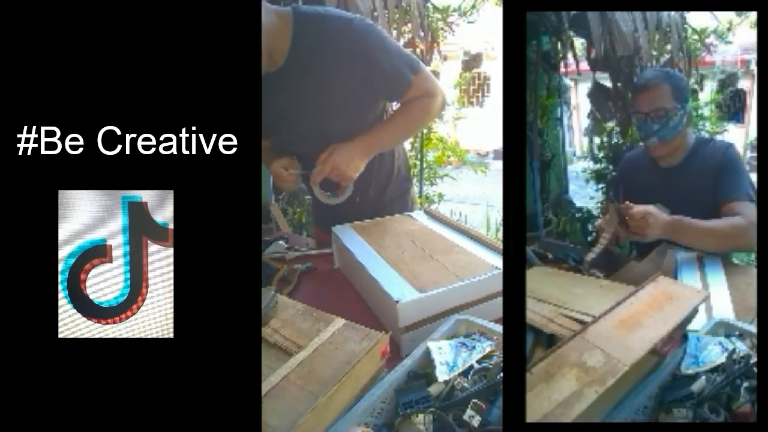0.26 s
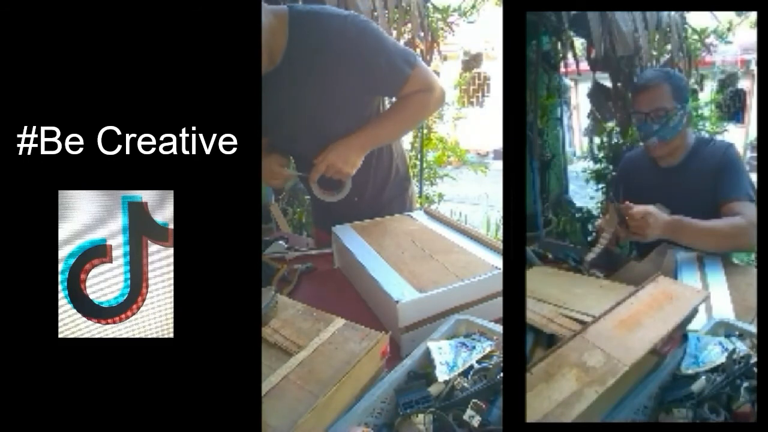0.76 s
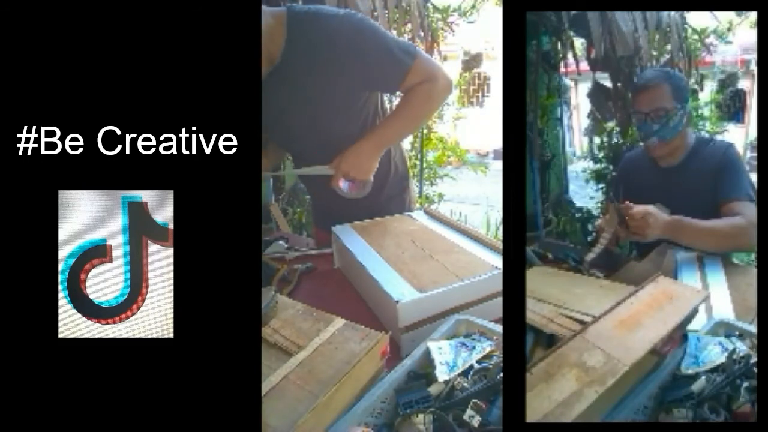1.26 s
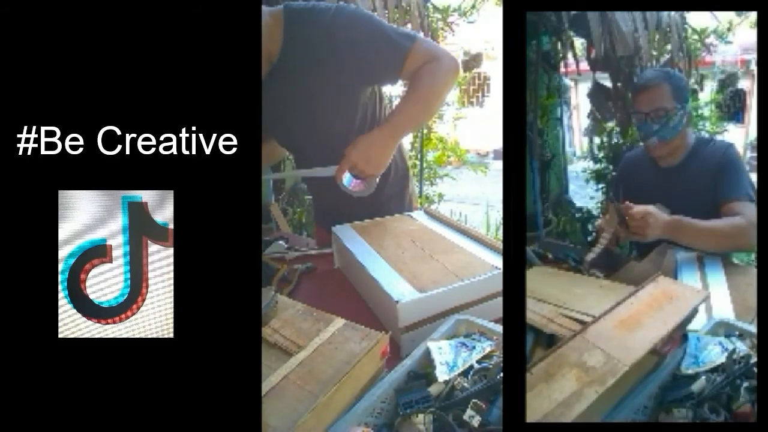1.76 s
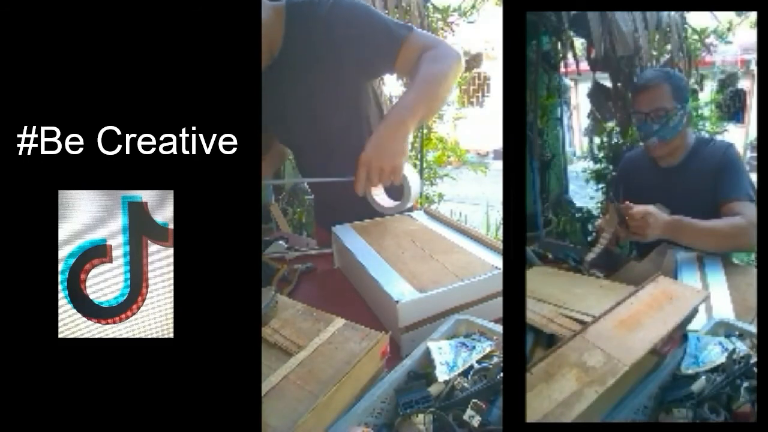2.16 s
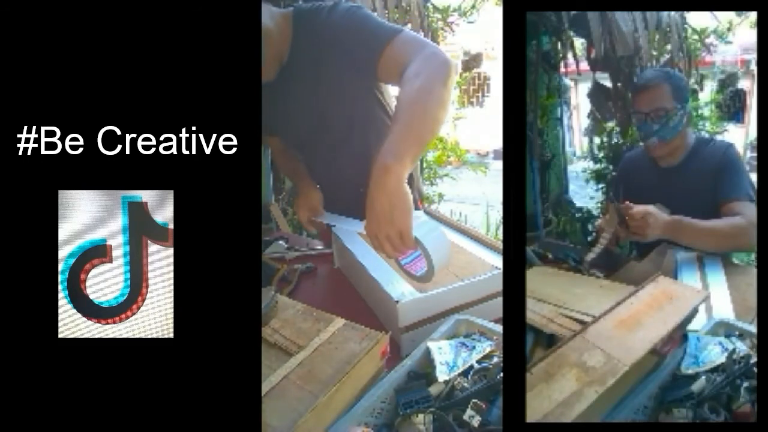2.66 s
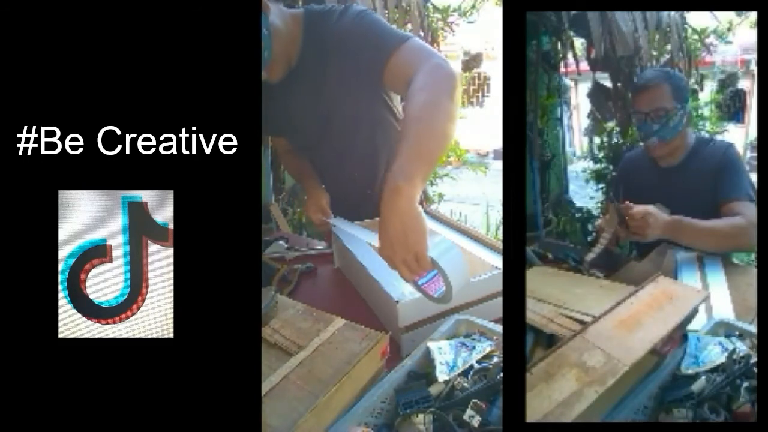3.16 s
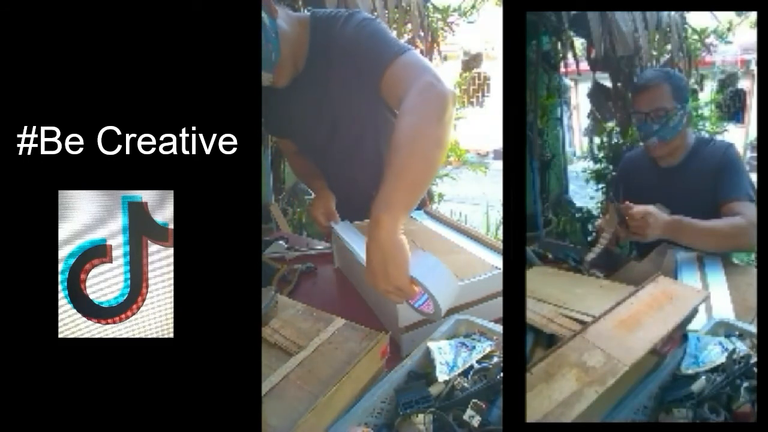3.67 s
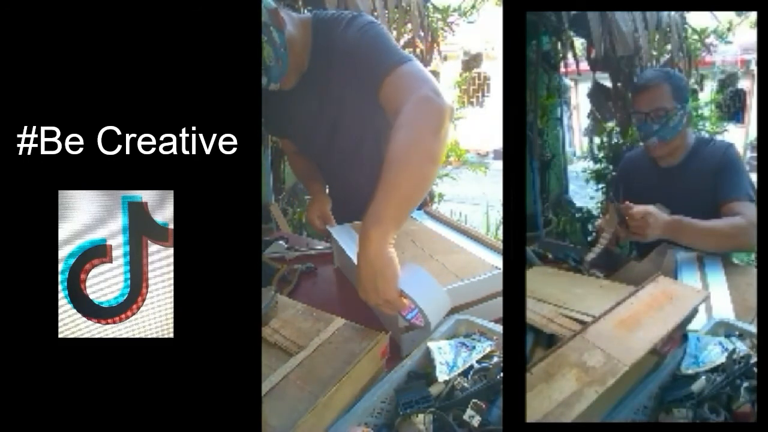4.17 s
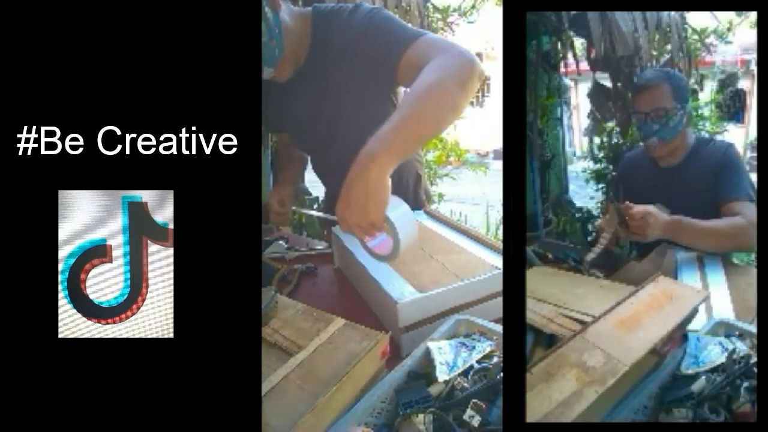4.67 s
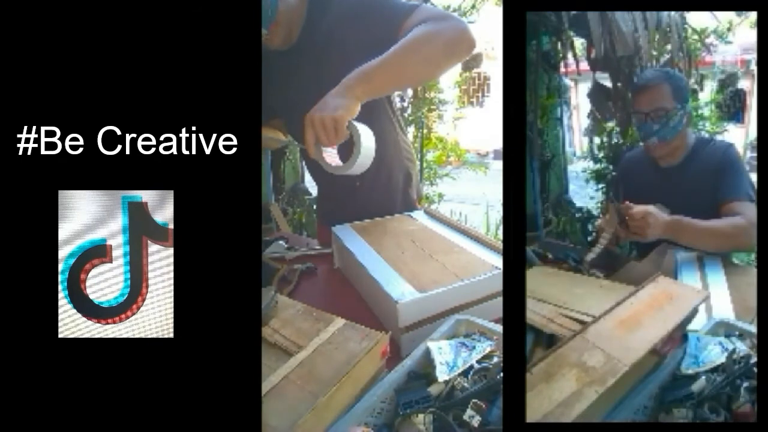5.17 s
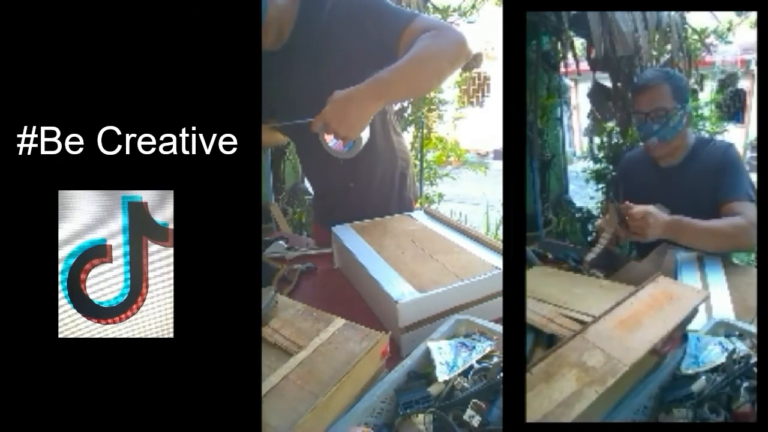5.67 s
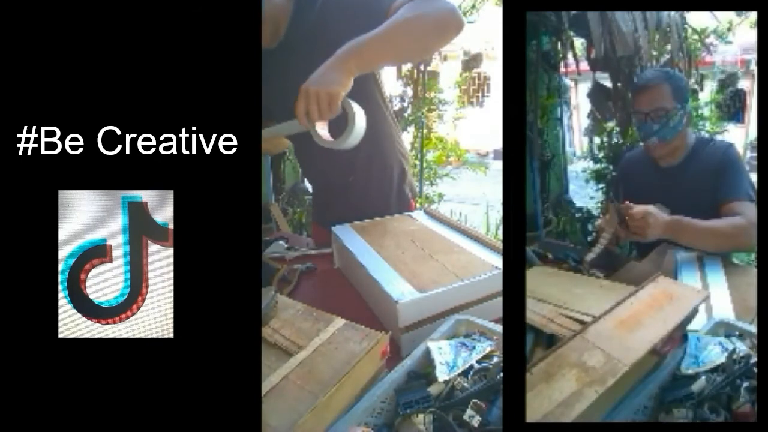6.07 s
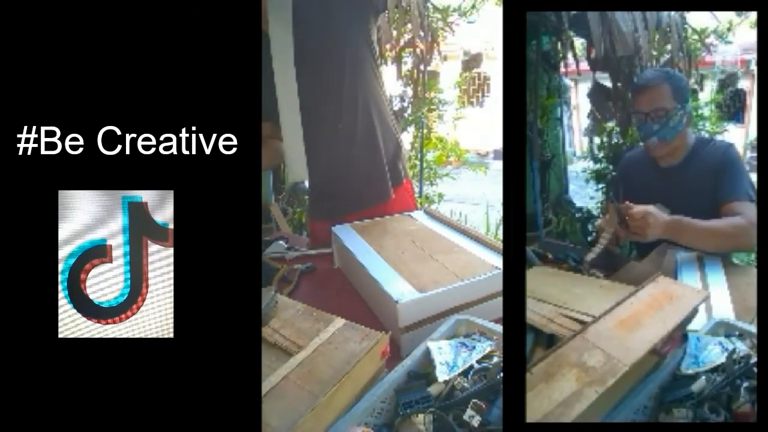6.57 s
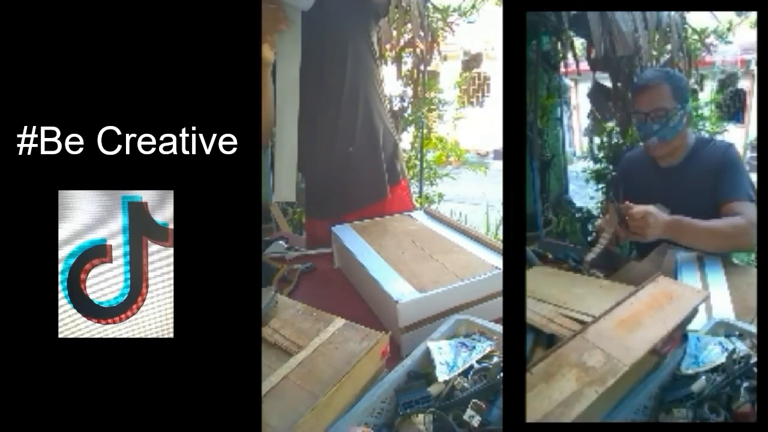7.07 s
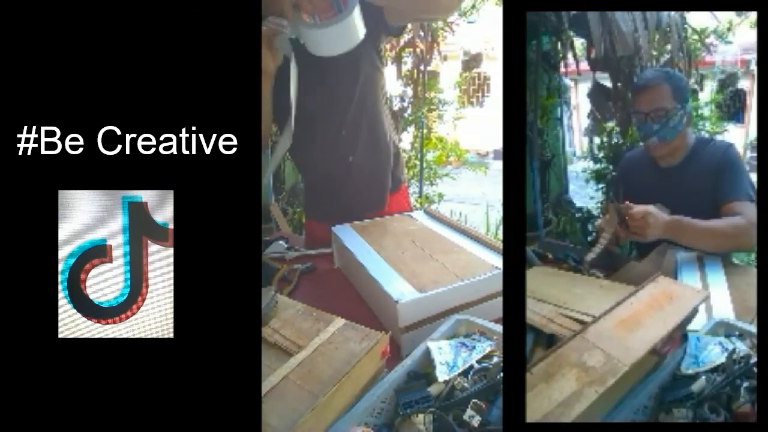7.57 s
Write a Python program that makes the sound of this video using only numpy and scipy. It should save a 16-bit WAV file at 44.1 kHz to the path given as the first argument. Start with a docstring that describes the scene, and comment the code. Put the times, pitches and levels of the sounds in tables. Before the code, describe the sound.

Sticky tape is pulled in four quick, rasping jerks, each about a tenth of a second, very close and dry with a light outdoor echo. A weaker tug and gentle hand smoothing follow, under faint wavering rooster crows, hen clucks and thin bird peeps. After a sharp snap and a quieter background, one fast rip and a soft crackling draw finish it.

```python
"""Sticky tape is jerked off a roll in a leafy yard: four loud rips, a slow tug, a nick and a snap of the strip,
then one more rip and a slow crackling peel. The glue lets go in dense random snaps, coloured by strip and core.
A hand smooths the tape down on a box in strokes of filtered noise. Roosters crow near and far and a hen clucks,
as unsteady harmonic tones shaped by a throat; small birds peep in gliding sines. Air and echoes surround it all."""
import sys
import numpy as np
from scipy import signal
from scipy.fft import rfft, irfft
from scipy.io import wavfile

SR = 44100
rng = np.random.default_rng(int(sys.argv[2]) if len(sys.argv) > 2 else 0)


def unload_wav(signal):
    """Save mono or channel-first audio to the path in sys.argv[1] as 16-bit WAV at rate SR, clipped to [-1, 1]."""
    wavfile.write(
        sys.argv[1],
        SR,
        np.round(np.clip(np.atleast_2d(signal).T, -1, 1) * 32767).astype(np.int16),
    )


N = 344862
TIME = np.arange(N) / SR

# Event levels are set ahead of each source's trims and the mix; spectrum levels are relative.

# outdoor air spectrum: pitch_hz, level_db
AIR_SPECTRUM = [(15, -12), (25, 1), (48, -1), (68, 4), (95, -3), (164, -10), (445, -13), (826, -10),
                (1300, -17), (1660, -15), (2560, -27), (4750, -25), (6210, -34), (7700, -48), (15500, -47)]
AIR_LEVEL_DB = -52.5
# one near rooster note: start_s, length_s, pitch_hz, level_db, sag (share of pitch lost by the end),
# second_harmonic_db, hoarseness (share of pitch)
NEAR_CROW = (0, .17, 925, -29.5, .2, 0, .004)
# distant rooster notes: start_s, length_s, pitch_hz, level_db, sag (share of pitch), second_harmonic_db,
# hoarseness (share of pitch)
FAR_CROWS = [(2.17, .18, 1030, -45, .02, -9, .045), (3.09, .23, 795, -44, .02, 2, .028),
             (3.35, .23, 920, -40.5, .03, -6, .032), (3.50, 1.42, 570, -59, .03, 0, .03),
             (3.56, .29, 815, -42, .01, -3, .02), (4.10, .75, 766, -47, .21, -4, .012),
             (5.32, .29, 872, -51.5, 0, 5, .011), (5.68, .20, 893, -53, 0, -3, .013),
             (5.87, .40, 897, -48, .02, -4, .009), (6.42, .50, 840, -52.5, .14, 1, .016)]
# near rooster's throat, the strength of a harmonic at each pitch: pitch_hz, level_db
NEAR_THROAT = [(900, -7.5), (1830, 0), (2700, -39), (3700, -31), (4600, -38), (5500, -20), (6400, -30),
               (7500, -52)]
# distant roosters' throat: pitch_hz, level_db
FAR_THROAT = [(550, -1), (850, 0), (1350, -10), (1600, -3), (1760, 0), (2000, -8), (2300, -8), (2550, -17),
              (4000, -28), (6000, -42)]
# hen's throat: pitch_hz, level_db
HEN_THROAT = [(450, 0), (900, -12), (1400, -14), (2500, -26), (4000, -45)]
# hen clucks: start_s, pitch_hz, level_db
CLUCKS = [(.42, 560, -53), (2.45, 460, -51), (3.22, 450, -50), (3.36, 500, -54), (3.97, 460, -49),
          (4.1, 420, -56)]
CLUCK_LENGTH_S = .09
CLUCK_SAG, CLUCK_HOARSENESS = .06, .06   # shares of pitch
# a note's ends are this much weaker; a sagging note loses this much per whole pitch
NOTE_EDGE_DB, SAG_LOSS_DB = 16, 60

# nicks and snaps of the strip: start_s, level_db, t60_s, ring_hz, ring_db (relative)
STRIP_SNAPS = [(.035, -40, .03, 5000, -6), (2.296, -37, .015, 4000, -6), (2.715, -49, .05, 2200, -6),
               (4.748, -52, .02, 4000, -6), (5.6685, -20, .022, 2000, 6), (5.6815, -23, .022, 1950, 4),
               (5.685, -30, .1, 3700, 0), (6.164, -29, .025, 4000, -6)]
# spectrum of a strip snap: pitch_hz, level_db
SNAP_SPECTRUM = [(100, -8), (400, -2), (700, -3), (1200, -3), (2200, -2), (4000, 1), (6300, -5),
                 (8000, -21), (11000, -26), (15000, -37)]
# flaps of the slack strip: start_s, level_db, t60_s
STRIP_FLAPS = [(1.503, -39, .1), (1.528, -40, .12), (1.869, -32, .12), (1.895, -27.5, .14),
               (1.927, -31.5, .18)]
# spectrum of a flap: pitch_hz, level_db
FLAP_SPECTRUM = [(40, -9), (120, 1), (230, -1), (400, -10), (800, -20), (1400, -25), (3000, -45),
                 (8000, -65)]
# strokes of the hand smoothing tape down: full_pressure_s, level_db, t60_s
RUBS = [(2.07, -44, .4), (2.24, -43, .8), (2.71, -53, .9), (3.15, -47, 1.9), (3.44, -46.5, 3.8),
        (4.53, -56, 2.5), (4.99, -47, .8), (5.41, -52, .9)]
# spectrum of the rubbing hand: pitch_hz, level_db
RUB_SPECTRUM = [(200, -14), (600, -3), (1100, 0), (2000, -5), (4000, -10), (6300, -17), (8000, -42)]
RUB_ATTACK_S = .035

# thin high squeaks of a bird: start_s, level_db
SQUEAKS = [(.37, -60), (3.72, -61), (5.96, -62)]
# soft peeps: start_s, level_db
PEEPS = [(.42, -53), (1.82, -52), (2.27, -55), (2.98, -58), (3.36, -58), (3.76, -54), (4.67, -58),
         (6.61, -54)]
# harsh chirps: start_s, level_db
CHIRPS = [(.79, -52), (1.9, -44), (3.595, -50), (4.375, -54), (5.81, -44), (6.44, -54)]
# falling whistles: start_s, level_db
WHISTLES = [(2.84, -49.5), (3.97, -49), (5.36, -51.5), (7.025, -53)]

# jerks of the tape: start_s, length_s, level_db, climb_db, thrum_db, core_hz, core_db, strip_hz, strip_db,
# treble_db, lowest_hz
JERKS = [(.530, .086, -13.2, 11, -1, 320, 7, 920, 7, 0, 170),
         (.888, .088, -12.8, 5, -1, 415, 11, 750, 6, -1.5, 65),
         (1.227, .122, -13.5, 4.5, 2, 395, 5, 1060, 2, -1, 55),
         (1.592, .091, -14.5, 10, .5, 215, 7, 1700, 3, -3, 35)]
# a jerk climbs over this share of its length, holds, and stops in this time
JERK_RISE_SHARE, JERK_STOP_S = .41, .021
# thrum of the roll: pitch_hz, level_db
THRUM_SPECTRUM = [(40, -26), (85, -10), (130, -3), (200, -4), (250, -5), (310, 0), (410, 2.5), (560, -4),
                  (760, -3), (1150, -5), (1700, -16), (4000, -35)]
# rasp of the taut strip: pitch_hz, level_db
RASP_SPECTRUM = [(120, -35), (400, -14), (900, -8), (1450, -3), (1850, -4), (2300, -1), (2850, 1),
                 (3250, -2), (3800, 0), (4600, -9), (6300, -11), (7400, -22), (15500, -38)]
# treble that a tight strip spits: pitch_hz, level_db
SPIT_SPECTRUM = [(2000, -25), (4500, -1), (6300, 5), (7600, -3), (11000, -2.5), (13500, -6), (15500, -13)]
# one slow tug: start_s, length_s, level_db, climb_db
SLOW_TUG = (1.988, .078, -25.3, 4.5)
# spectrum of the tug: pitch_hz, level_db
TUG_SPECTRUM = [(80, -22), (250, -16), (420, -16), (560, -8), (800, -3), (1100, -3), (1650, -1),
                (1900, -12), (3700, -20), (5500, -32), (8000, -66)]
# one last rip: start_s, length_s, level_db, climb_db
LAST_RIP = (7.202, .052, -11.5, 17)
# spectrum of the last rip: pitch_hz, level_db
RIP_SPECTRUM = [(120, -57), (200, -27), (378, -18), (1050, -14), (1230, -5), (1910, -14), (2560, -3),
                (3010, -4), (3420, -10), (4030, 1), (4750, -11), (5800, -8), (7900, -22), (11000, -21),
                (15500, -41)]

# slow peel: the tape creeps, gives way, and pays out in one smooth draw
CREEP_START_S, CREEP_DB = 7.26, -56.5
PEEL_START_S, PEEL_ATTACK_S, PEEL_DB = 7.42, .025, -42
DRAW_FASTEST_S, DRAW_WIDTH_S, DRAW_GAIN_DB = 7.585, .07, 4.5
SHORT_STRIP_HZ, LONG_STRIP_HZ = 3750, 2350
# loudest pops of the peel: start_s, level_db (relative)
PEEL_POPS = [(7.4614, -26), (7.5113, -26), (7.5418, -18), (7.5574, -25), (7.5692, -24), (7.5991, -23),
             (7.6321, -26), (7.6735, -26), (7.7752, -25)]
# crackle of the peel: pitch_hz, level_db
CRACKLE_SPECTRUM = [(150, -18), (700, 3), (1500, 1), (5500, -8), (7500, -23), (11000, -29), (15000, -42)]

# spectrum of the yard's echo: pitch_hz, level_db
YARD_SPECTRUM = [(100, -7), (400, 1.5), (1000, -1.5), (2000, -2.5), (3500, -5), (6000, -2), (9000, -6),
                 (15000, -10)]
# fading time of the yard's echo: pitch_hz, t60_s
YARD_T60 = [(100, .5), (400, .6), (2000, .68), (5000, .62), (8000, .4), (15000, .27)]
CUTOFF_HZ = 15900


def from_db(db):
    """Decibels to gain."""
    return 10 ** (np.asarray(db) / 20)


def rms_one(x):
    """Scale to unit rms."""
    return x / np.sqrt(np.mean(x ** 2) + 1e-20)


def at_hz(points, hz):
    """Read a spectrum on a log-frequency axis."""
    known_hz, values = np.transpose(points)
    return np.interp(np.log(np.maximum(hz, 1)), np.log(known_hz), values)


def swell(times, levels_db, t=TIME):
    """Gain along a level curve, silent outside it."""
    inside = (t >= times[0]) * (t <= times[-1])
    return from_db(np.interp(t, times, levels_db)) * inside


def drift(rate, size=N):
    """Smooth chance with `rate` new values a second, spread a little under 1."""
    place = np.arange(size) * min(rate / SR, 1)
    return np.interp(place, np.arange(size), rng.standard_normal(size))


def colour(x, spectrum):
    """Causal (minimum-phase) filter with this spectrum; white noise keeps its power."""
    size = 2048
    gain = rms_one(from_db(at_hz(spectrum, np.fft.rfftfreq(size, 1 / SR))))
    # folding the cepstrum onto positive time gives the minimum phase
    cepstrum = irfft(np.log(gain))[:size // 2]
    cepstrum[1:] *= 2
    impulse = irfft(np.exp(rfft(cepstrum, size)))
    return signal.oaconvolve(x, impulse)[:len(x)]


def resonate(x, hz, width_hz):
    """One steep-sided resonance, whose centre may move; white noise keeps its power."""
    r = np.exp(-1.55 * np.pi * width_hz / SR)   # 1.55 makes up for the narrowing by two equal poles
    turn = np.exp(2j * np.pi * np.cumsum(hz * np.ones(len(x))) / SR)
    gain = np.sqrt(2 * (1 - r * r) ** 3 / (1 + r * r))
    # shift the centre down to zero, smooth, and shift back up
    smooth = signal.lfilter([1], [1, -2 * r, r * r], x / turn + 1e-18)
    return gain * (turn * smooth).real


def boost(x, hz, width_hz, db):
    """Raise one resonance out of a broad sound."""
    b, a = signal.iirpeak(hz, hz / width_hz, fs=SR)
    return x + (from_db(db) - 1) * signal.lfilter(b, a, x)


def add(track, start, sound):
    """Mix a sound into a track from a given second on."""
    i = max(round(start * SR), 0)
    track[i:i + len(sound)] += sound[:N - i]


def outdoor_air():
    """Steady air: coloured noise whose level drifts gently."""
    level_db = AIR_LEVEL_DB + .7 * drift(8)
    return from_db(level_db) * colour(rng.standard_normal(N), AIR_SPECTRUM)


def call(note, throat, attack_s, release_s, sag_power, shimmer_db):
    """A fowl's harmonic tone through the throat sags and weakens, later with a higher sag_power."""
    start, length, pitch_hz, db, sag, second_db, hoarseness = note
    t = np.arange(0, length, 1 / SR)
    sunk = sag * (t / length) ** sag_power
    hz = pitch_hz * (1 - sunk) * (1 + hoarseness * drift(250, len(t)))
    phase = 2 * np.pi * np.cumsum(hz) / SR
    tone = np.zeros(len(t))
    for k in range(1, 9):
        harmonic_db = at_hz(throat, k * hz) + second_db * (k == 2)
        tone += from_db(harmonic_db) * np.sin(k * phase)
    opened = np.minimum(1, np.minimum(t / attack_s, (length - t) / release_s))
    level_db = db - NOTE_EDGE_DB * (1 - opened) - SAG_LOSS_DB * sunk
    level_db = level_db + shimmer_db * drift(60, len(t))
    out = np.zeros(N)
    add(out, start, rms_one(tone) * from_db(level_db))
    return out


def near_rooster():
    """One abrupt, nearly steady note holds its pitch, then sags late."""
    return call(NEAR_CROW, NEAR_THROAT, attack_s=.003, release_s=.025, sag_power=6.0, shimmer_db=1.5)


def glue_snaps(per_s, spread_db, size):
    """Threads of glue break at random moments with uneven strength; rms 1."""
    strength = from_db(spread_db * np.clip(rng.standard_normal(size), -2, 2))
    strength = strength * rng.choice([-1, 1], size)
    return rms_one(strength * (rng.random(size) < per_s / SR))


def burst(db, t60):
    """A volley of tiny snaps that dies away."""
    t = np.arange(SR // 4) / SR
    return glue_snaps(10000, 3, len(t)) * from_db(db - 60 * t / t60)


def strip_snaps():
    """The strip is nicked and snaps: dying volleys with a broad colour and a ring."""
    out = np.zeros(N)
    for start, db, t60, ring_hz, ring_db in STRIP_SNAPS:
        snaps = burst(db, t60)
        ring = from_db(ring_db - 3) * resonate(snaps, ring_hz, 400)
        add(out, start, colour(snaps, SNAP_SPECTRUM) + ring)
    return out


def whistled(rows, length_s, top_hz, end_hz, waver):
    """A repeated bird whistle lifts briefly, then falls, wavering by a share of its pitch."""
    out = np.zeros(N)
    u = np.linspace(0, 1, int(length_s * SR))
    height = np.interp(u, [0, .22, .52, .82, 1], [.85, 1, .46, .22, 0])
    for start, db in rows:
        hz = (end_hz + (top_hz - end_hz) * height) * (1 + waver * drift(900, len(u)))
        level = from_db(db + 2 * drift(80, len(u))) * np.sin(np.pi * u ** 1.3)
        add(out, start, level * np.sin(2 * np.pi * np.cumsum(hz) / SR))
    return out


def birds():
    """Small birds with four kinds of gliding, wavering note."""
    return (whistled(SQUEAKS, length_s=.085, top_hz=7050, end_hz=6500, waver=.03)
            + whistled(PEEPS, length_s=.13, top_hz=5020, end_hz=4520, waver=.026)
            + whistled(CHIRPS, length_s=.055, top_hz=4250, end_hz=3100, waver=.11)
            + whistled(WHISTLES, length_s=.145, top_hz=6850, end_hz=3950, waver=.018))


def hen_clucks():
    """A hen's short, hoarse notes, equally long and drooping by the same share of pitch."""
    out = np.zeros(N)
    for start, hz, db in CLUCKS:
        note = (start, CLUCK_LENGTH_S, hz, db, CLUCK_SAG, 0, CLUCK_HOARSENESS)
        out += call(note, HEN_THROAT, attack_s=.02, release_s=.04, sag_power=1.2, shimmer_db=3)
    return out


def along_strip(x, first_s=.0011, growth=.03, bounce=.3):
    """Each snap runs to the strip's held end and back, a trip that lengthens as tape pays out."""
    i = np.arange(len(x))
    trip = first_s * SR * rng.uniform(.8, 1.25) + growth * i   # first_s is a typical first trip
    return sum(bounce ** k * np.interp(i - k * np.round(trip), i, x, left=0) for k in range(4))


def stroke(row, rise_share, stop_s, typical_slips_per_s=380, slip_depth=.55, grip_db=1.3, stop_db=-15):
    """One pull: the peel line sticks and slips unevenly, each slip a volley of glue snaps."""
    start, length, db, climb_db = row
    t = np.arange(SR // 4) / SR
    slip_rate = typical_slips_per_s * np.exp(.3 * drift(300, len(t)))
    cycle = np.cumsum(slip_rate) / SR % 1
    slip = 1 + slip_depth * (1 - 2 * cycle)
    grip = from_db(grip_db * drift(220, len(t)))   # the glue holds better in some places
    volleys = rms_one(along_strip(glue_snaps(5000, 3, len(t)) * slip * grip))
    take_up = 1 - np.exp(-t / .0012)   # the strip needs a moment to come taut
    times = [0, rise_share * length, length - stop_s, length]
    return volleys * take_up * swell(times, [db - climb_db, db, db, db + stop_db], t)


def jerks(early_thrum_db=3, late_thrum_db=-6, early_treble_db=-3, late_treble_db=1, spit_db=2.5):
    """The roll thrums at first; the strip's rasp takes over and spits treble as it pulls tight."""
    out = np.zeros(N)
    for row in JERKS:
        start, length = row[:2]
        thrum_db, core_hz, core_db, strip_hz, strip_db, treble_db, lowest_hz = row[4:]
        # three independent draws of like snaps, for thrum, rasp and treble
        thrum_snaps, rasp_snaps, spit_snaps = (stroke(row[:4], JERK_RISE_SHARE, JERK_STOP_S) for _ in range(3))
        t = np.arange(len(spit_snaps)) / SR
        thrum_level = thrum_db - 6.5 + np.interp(t, [0, length], [early_thrum_db, late_thrum_db])
        thrum = colour(thrum_snaps, THRUM_SPECTRUM) * from_db(thrum_level)
        rasp = colour(rasp_snaps, RASP_SPECTRUM) * from_db(-1)
        spit_level = treble_db - 13 + np.interp(t, [0, length], [early_treble_db, late_treble_db])
        flicker = spit_db * drift(260, len(t))
        spit = colour(spit_snaps * from_db(spit_level + flicker), SPIT_SPECTRUM)
        rip = boost(thrum + rasp + spit, core_hz, 60, core_db)
        rip = boost(rip, strip_hz, 140, strip_db)
        # a longer free strip carries deeper notes
        low_cut = signal.butter(3, lowest_hz, "high", fs=SR, output="sos")
        add(out, start, signal.sosfilt(low_cut, rip))
    return out


def strip_flaps():
    """The slack strip flaps: low-coloured volleys that die away."""
    out = np.zeros(N)
    for start, db, t60 in STRIP_FLAPS:
        add(out, start, colour(burst(db, t60), FLAP_SPECTRUM))
    return out


def slow_tug():
    """A slow, dull pull that climbs through most of its length."""
    out = np.zeros(N)
    add(out, SLOW_TUG[0], colour(stroke(SLOW_TUG, rise_share=.63, stop_s=.016), TUG_SPECTRUM))
    return out


def smoothing_hand():
    """The strip is rubbed down on the box in noise strokes that land fast and ease off."""
    strokes = [swell([s - RUB_ATTACK_S, s, s + t60], [db - 20, db, db - 60]) for s, db, t60 in RUBS]
    pressure = np.max(strokes, axis=0)
    rub = colour(rng.standard_normal(N), RUB_SPECTRUM)
    return from_db(-6) * rub * pressure * from_db(1.5 * drift(30))


def far_roosters():
    """Distant roosters' unsteady notes swell and fade more gently than the near one's."""
    return sum(call(note, FAR_THROAT, attack_s=.06, release_s=.07, sag_power=1.8, shimmer_db=2.2)
               for note in FAR_CROWS)


def last_rip():
    """A fast, bright pull that climbs steeply and stops short."""
    out = np.zeros(N)
    add(out, LAST_RIP[0], colour(stroke(LAST_RIP, rise_share=.2, stop_s=.007), RIP_SPECTRUM))
    return out


def slow_peel(pop_db=9.5, overtone_db=-24, crackle_db=-5.5, snatch_db=2.5):
    """Snaps ring the free strip, growing with the draw's speed; its pitch sinks as it lengthens."""
    drawn = np.tanh((TIME - DRAW_FASTEST_S) / DRAW_WIDTH_S)   # -1 before the draw, 1 after it
    speed = 1 - drawn ** 2
    level_db = np.interp(TIME, [PEEL_START_S, PEEL_START_S + PEEL_ATTACK_S], [CREEP_DB, PEEL_DB])
    level_db = level_db + DRAW_GAIN_DB * speed + snatch_db * drift(200)
    snaps = glue_snaps(1600, 3.5, N) * (TIME > CREEP_START_S) * from_db(level_db)
    for start, db in PEEL_POPS:
        add(snaps, start, from_db([db + pop_db]))   # a single-sample click
    hz = np.interp(drawn, [-1, 1], [SHORT_STRIP_HZ, LONG_STRIP_HZ])
    ring = resonate(snaps, hz, 750) + from_db(overtone_db) * resonate(snaps, 2.25 * hz, 900)
    soft = signal.sosfilt(signal.butter(2, 9000, "low", fs=SR, output="sos"), ring)
    return soft + from_db(crackle_db) * colour(snaps, CRACKLE_SPECTRUM)


def yard_echo(build_s=.012):
    """Scatter from walls, trunks and leaves: a diffuse tail whose treble dies first; unit energy."""
    t = np.arange(SR) / SR
    edges = np.geomspace(70, 17000, 12)
    tail = 0
    for low, high in zip(edges, edges[1:]):
        hz = np.sqrt(low * high)
        band_pass = signal.butter(2, [low, high], "band", fs=SR, output="sos")
        band = signal.sosfilt(band_pass, rng.standard_normal(SR))
        tail = tail + band * from_db(at_hz(YARD_SPECTRUM, hz) - 60 * t / at_hz(YARD_T60, hz))
    return rms_one(tail * (1 - np.exp(-t / build_s))) / np.sqrt(SR)


def bench_echo(t60=.09):
    """A few quick reflections off the bench, box and body; unit energy."""
    t = np.arange(SR // 10) / SR
    taps = glue_snaps(900, 3, len(t)) * from_db(-60 * t / t60) * (t > .001)   # sparse random clicks
    return rms_one(colour(taps, YARD_SPECTRUM)) / np.sqrt(len(t))


def scene():
    """Tape, near rooster, small birds and far fowl, with a rising share of yard echo in that order."""
    tape = strip_snaps() + jerks() + strip_flaps() + slow_tug() + smoothing_hand() + last_rip() + slow_peel()
    rooster = near_rooster()
    peeps = birds()
    fowl = hen_clucks() + far_roosters()
    direct = tape + rooster + from_db(1) * peeps + from_db(-7) * fowl
    scattered = from_db(-21) * tape + from_db(-10.5) * rooster + from_db(-6) * peeps + from_db(-5) * fowl
    yard = signal.oaconvolve(scattered, yard_echo())[:N]
    bench = from_db(-12) * signal.oaconvolve(tape, bench_echo())[:N]
    return (direct + yard + bench + outdoor_air())[None]


def record(dry):
    """The highest peaks are rounded and the top is cut."""
    rounded = 1.5 * np.tanh(dry / 1.5)
    top_cut = signal.ellip(12, .1, 80, CUTOFF_HZ, fs=SR, output="sos")
    return signal.sosfilt(top_cut, rounded)


dry = scene()
out = record(dry)
unload_wav(out)
```